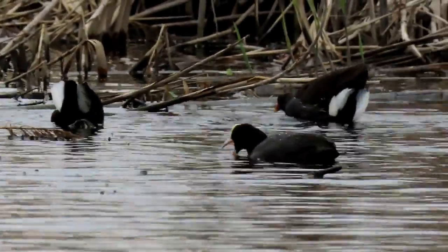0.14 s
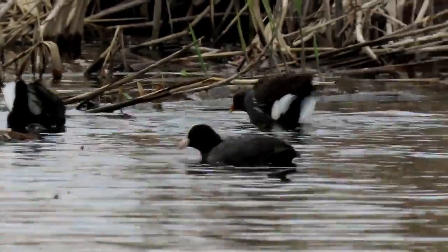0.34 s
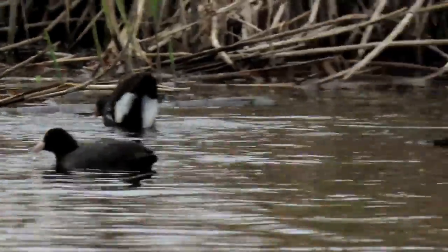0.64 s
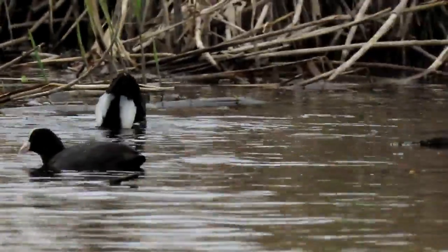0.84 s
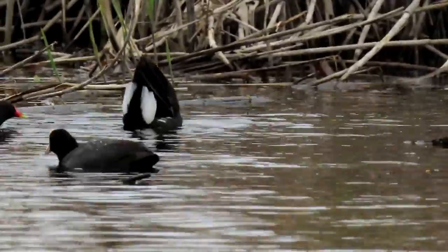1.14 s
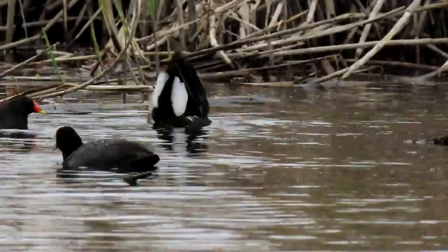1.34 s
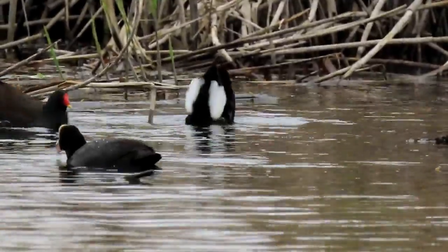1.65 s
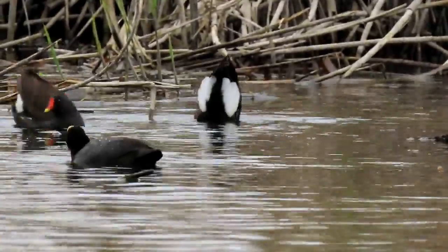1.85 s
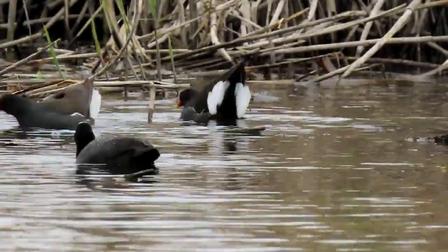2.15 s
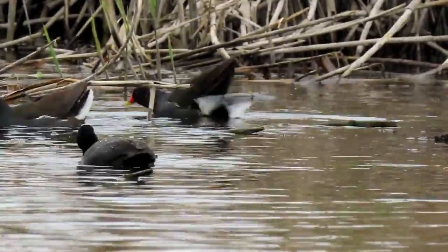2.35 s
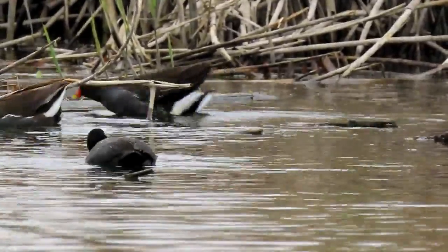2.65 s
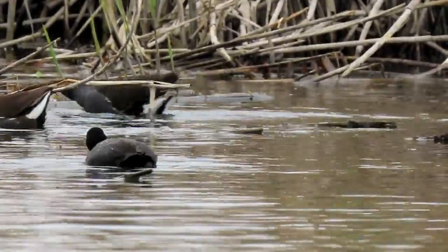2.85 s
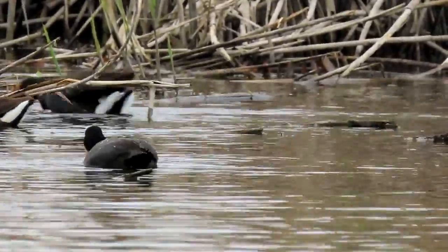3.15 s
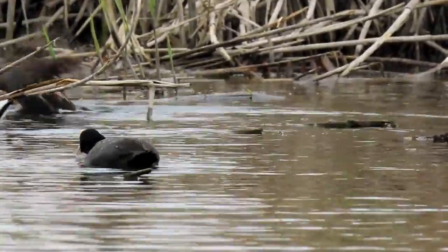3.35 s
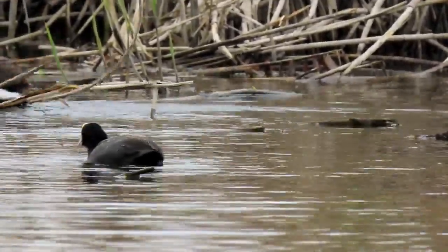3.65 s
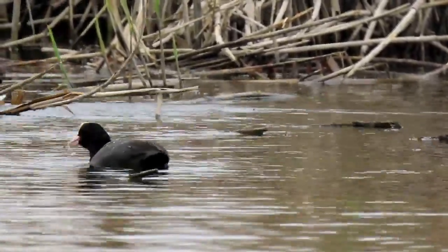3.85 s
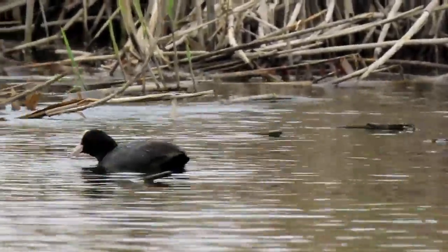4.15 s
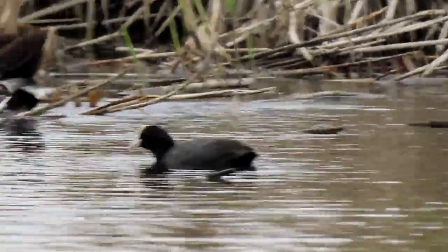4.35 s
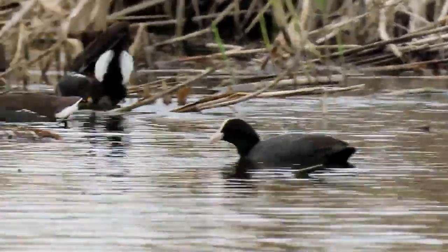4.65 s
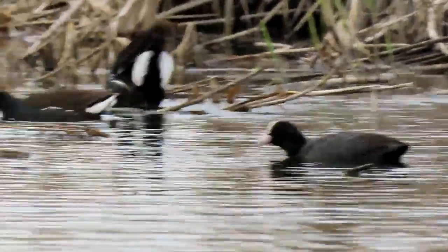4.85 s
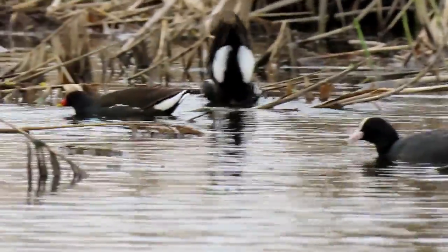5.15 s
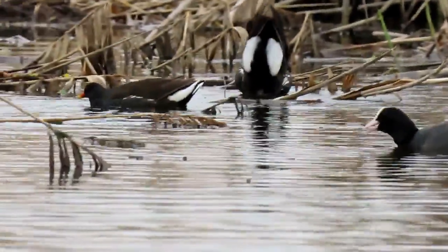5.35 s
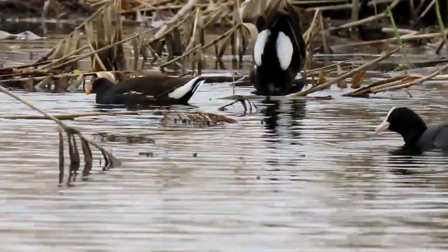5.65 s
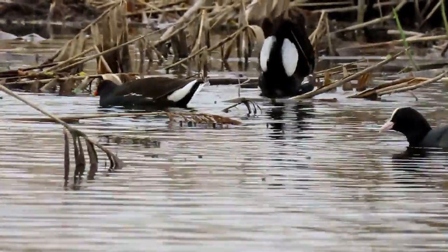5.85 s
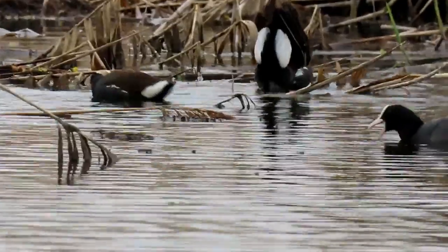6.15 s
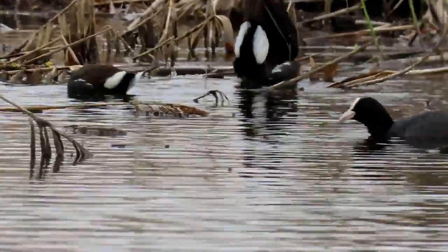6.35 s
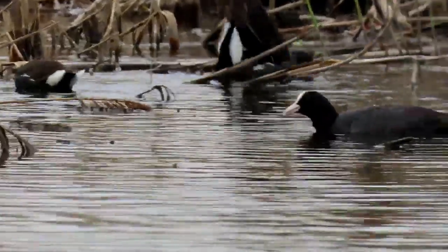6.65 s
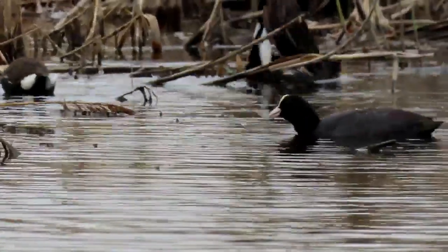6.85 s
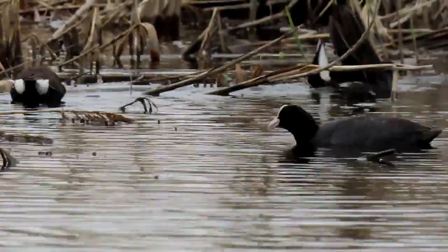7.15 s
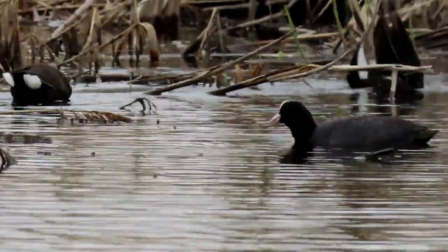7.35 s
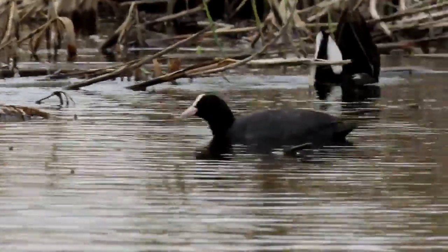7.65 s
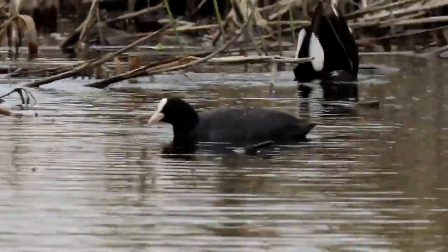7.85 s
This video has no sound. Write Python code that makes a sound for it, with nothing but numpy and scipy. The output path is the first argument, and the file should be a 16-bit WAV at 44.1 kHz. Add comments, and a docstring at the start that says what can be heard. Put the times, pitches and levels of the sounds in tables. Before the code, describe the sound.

On an open reedy lake, a nearby coot gives abrupt, raspy 'kow' calls a little under a second apart, each throbbing hard and then dropping in pitch. Quieter, hoarse notes slip in between. Reeds and bank scatter short echoes. Wind thumps and flutters low on close-set stereo microphones, strongest around three seconds and again near seven, over a faint distant wash.

```python
"""A reedy lake, heard in stereo: near coots, one repeating a sharp, throbbing 'kow', others softer notes.
Strained, clapping partials and breath noise make the calls; reeds, bank and trees scatter them in echoes.
Faint whistled glides are small birds and one high ring after a soft note; short decaying rings are water
ticks and brief knocks at the edges of some soft notes. Gusts buffet the microphones with shaped noise and
pressure pulses; early on a low whirr of blurred tones comes and goes over a faint, distant wash of noise."""
import sys
import numpy as np
from scipy import signal
from scipy.fft import rfft, irfft
from scipy.io import wavfile
from scipy.ndimage import uniform_filter1d, map_coordinates

SR = 44100
rng = np.random.default_rng(int(sys.argv[2]) if len(sys.argv) > 2 else 0)


def persist_wave(psi):
    """Save psi, clipped to +-1, as 16-bit WAV."""
    counts = np.round(np.clip(psi, -1, 1) * 32767).astype(np.int16)
    wavfile.write(sys.argv[1], SR, np.atleast_2d(counts).T)


N = 352800

# sharp calls: start_s, pitch_hz (before scoop and sink), sink_s, level_db, brightness_db_per_octave
KOWS = [(.3785, 1167, 0.036, -20.5, 1.5), (1.3165, 1116, 0.035, -21, -1.5),
        (1.9387, 1127, 0.039, -20.5, -2), (2.7510, 1127, 0.037, -19.5, -1.5),
        (3.5250, 1145, 0.044, -21, -1.5), (4.2780, 1117, 0.039, -22.5, 1.5),
        (4.9242, 1081, 0.031, -25, 1.8), (5.7285, 1123, 0.038, -22.5, 2), (6.3652, 1115, 0.033, -26.5, 1),
        (7.9725, 1042, 0.074, -26, 1.5)]
# resonance of throat and bill: frequency_hz, gain_db
THROAT = [(700, 16), (950, -1.5), (1150, -4.5), (1850, 2), (2150, -5), (2700, -14), (3250, -6.5),
          (3700, -23.5), (4150, -13), (4650, -25.5), (7000, -35), (9500, -42.5), (14000, -61)]
# rasp of air in the bill: frequency_hz, relative_level_db
RASP = [(600, -50), (1150, 12.5), (1550, -7.5), (2150, 20), (2650, -10.5), (3300, 6.5), (4050, 3),
        (4650, -12), (7200, -14.5), (10000, -34), (15000, -62)]
# soft notes: start_s, length_s, start_hz, middle_hz, end_hz, level_db, fade_db (over the note),
# second_partial_db, third_partial_db, upper_partials_db
NOTES = [(.935, 0.038, 1046, 932, 946, -32, 13.5, -0.5, -14.5, -21),
         (3.705, 0.013, 896, 900, 890, -40, 2, -2, -19, -16),
         (3.886, 0.022, 940, 920, 835, -43, 11, 7, -19, -19),
         (3.912, 0.054, 893, 818, 714, -53.5, 7, 5.5, -19, -24),
         (5.391, 0.02, 936, 932, 950, -35, 0, 1, -18, -21),
         (6.907, 0.051, 1010, 911, 887, -29.5, 17.5, 4.5, -3.5, -11),
         (6.956, 0.058, 942, 1059, 950, -41.5, -1.5, -23, 2, -10),
         (7.043, .052, 806, 910, 787, -40, 1.5, -7, -10, -8),
         (7.198, 0.041, 772, 818, 642, -45, 2, -5, -17, -6),
         (7.328, 0.05, 1014, 908, 938, -33.5, 7, 2, -7, -17.5)]
# bill colour on the upper partials of the soft notes: frequency_hz, gain_db
NOTE_TREBLE = [(2700, -1), (3300, -2), (4050, 4), (4700, -8.5), (5500, -13), (6300, -13.5), (7500, -25)]
# faint whistled glides, small birds and one high ring after a soft note:
# start_s, length_s, start_hz, end_hz, level_db
GLIDES = [(.67, 0.055, 5150, 4980, -64), (.702, 0.011, 3040, 2400, -46.5), (.98, 0.1, 4080, 3730, -62),
          (1.055, .03, 4750, 4550, -67), (1.285, 0.029, 4540, 4480, -57), (1.62, 0.054, 5750, 5200, -66),
          (2.875, 0.038, 6470, 4940, -56), (6.54, 0.17, 1988, 1970, -54)]
# short rings, water ticks and brief knocks at the edges of some soft notes:
# start_s, pitch_hz, level_db, decay_s
SHORT_RINGS = [(6.4440, 1070, -23.5, 0.0033), (6.4455, 1800, -26, 0.0025), (6.4490, 920, -28, 0.0028),
               (6.894, 1770, -34, 0.0035), (7.088, 4060, -32, 0.0019), (7.309, 954, -40, 0.0073)]
# echoes from the reed stems, mostly treble: frequency_hz, relative_level_db
REED_ECHO = [(600, -10), (1100, -14), (2100, -1), (3500, 5), (7000, 10.5), (14000, -1.5)]
# echoes from the far trees: frequency_hz, relative_level_db
TREE_ECHO = [(600, -1), (2100, -2.5), (4000, 5), (8000, -7.5), (14000, -19)]
# gusts on the microphones: peak_s, rise_s, fall_s, flutter_db, rumble_db (both trimmed in wind)
GUSTS = [(.04, 0.037, 0.031, -46, -39), (.18, 0.078, 0.044, -44.5, -45), (.44, 0.097, 0.055, -53, -45.5),
         (.73, 0.11, 0.2, -47.5, -43), (2.42, 0.045, 0.066, -37, -28), (2.51, 0.063, 0.05, -39, -36.5),
         (2.73, 0.018, 0.044, -48, -30), (2.805, 0.036, 0.041, -31, -27), (3.06, 0.085, 0.11, -28, -29),
         (3.25, 0.028, 0.022, -37, -32.5), (3.335, 0.017, 0.029, -26, -41),
         (3.41, 0.023, 0.016, -33.5, -30), (3.483, 0.041, .14, -24.5, -34.5),
         (4.11, 0.092, 0.067, -40, -47), (4.63, 0.017, 0.032, -60, -42), (4.91, 0.022, 0.029, -55, -42.5),
         (5.1, 0.11, 0.35, -38, -39), (5.46, 0.17, 0.13, -30, -38), (6.01, 0.12, 0.1, -35.5, -38.5),
         (6.25, 0.11, 0.29, -45, -45), (6.401, 0.02, 0.055, -32, -52), (6.62, 0.049, 0.062, -39, -38),
         (6.759, 0.077, 0.033, -26.5, -30), (6.85, 0.042, 0.025, -28, -29),
         (6.955, 0.074, 0.025, -27, -31.5), (7.055, 0.081, 0.11, -30.5, -35.5),
         (7.58, 0.057, 0.044, -45, -44), (7.95, 0.039, 0.012, -45.5, -48.5)]
# deep wind rumble: frequency_hz, relative_level_db
RUMBLE = [(20, -18), (40, -12), (60, 2), (100, 5.5), (130, 0.5), (200, -33), (400, -81)]
# flutter in light air: frequency_hz, relative_level_db
LIGHT_FLUTTER = [(80, -16), (130, 0), (180, 0), (230, -7), (320, -12.5), (450, -43), (650, -64)]
# flutter in a hard gust: frequency_hz, relative_level_db
HARD_FLUTTER = [(80, -38), (130, 2.5), (190, 4.5), (300, -2), (400, -3), (490, -13), (560, -27), (700, -29),
                (1200, -85)]
# flutter that differs between the two microphones: frequency_hz, relative_level_db
FLUTTER_SIDE = [(60, -14), (130, -8), (250, 13), (400, 11), (520, 0), (700, -9), (1200, -46)]
# single eddies that thump the microphones: centre_s, frequency_hz, pressure_db
EDDIES = [(0.857, 141, -27), (2.512, 90, -20), (2.797, 159, -15), (3.128, 154, -14), (3.484, 210, -9),
          (3.674, 310, -25.5), (5.47, 218, -15), (5.554, 232, -22.5), (6.045, 158, -18), (6.386, 228, -19),
          (6.458, 180, -19.5), (7.057, 210, -15.5)]
# swells of the low whirr: start_s, end_s, level_db, growth_db_per_s
WHIRRS = [(0.586, 1.285, -59.5, 8), (1.268, 1.478, -51.5, 25), (1.694, 2.357, -46, -1.5)]
# tones of the whirr: pitch_ratio, relative_level_db
WHIRR_LINES = [(1, -0.5), (1.15, -1), (1.36, -7), (1.6, -12.5), (1.9, -9.5)]
# band of noise around those tones: frequency_hz, relative_level_db
WHIRR_BLUR = [(200, 2), (310, 16), (430, 9), (560, 12.5), (700, 14.5), (850, -30), (1300, -42)]
# distant wash, with the hum of a far road near 900 Hz: frequency_hz, relative_level_db
WASH = [(20, 4), (90, -2), (200, -6.5), (480, -5.5), (680, -8), (880, 4), (1020, -3), (1250, -10.5),
        (2000, -11.5), (3300, -16.5), (5000, -20.5), (8000, -27), (10500, -32.5), (15000, -39.5)]
# hiss that differs between the two microphones: frequency_hz, level_db (relative to the wash)
HISS = [(200, -42), (380, -23), (900, -22), (2000, -9), (4000, -4), (8000, -1), (12000, 1.5)]

# course of every sharp call; ages are shares of its sinking time
KOW_SINK, KOW_SINK_AGE, KOW_SINK_SPREAD = .165, .83, 0.1026  # share the pitch falls, when, how gradually
KOW_SCOOP = 0.0508  # share by which the pitch starts low while the call swells
KOW_START_DB, KOW_SWELL_AGE = -7, 0.6  # starts softer, at full strength by that age
KOW_RELAX_DB, KOW_RELAX_AGE = -8, 1  # softer once the strain lets go
KOW_RELEASE_AGE, KOW_END_AGE = 1.4, 1.97  # fades out between these ages
THROB_HZ = 136
GUST_ROUNDNESS = 2.01  # 1 = a pointed swell, 2 = a bell
LULL_RUMBLE_DB, LULL_FLUTTER_DB = -56, -63.5  # light air between the gusts, trimmed like them
WHIRR_EDGE_S = .04  # half the length of each fade
WHIRR_TOP_HZ, WHIRR_END_HZ = 458, 316.3
WHIRR_SINKS_S, WHIRR_SINK_TIME_S = 1.18, 0.23  # centre and gradualness of its one fall in pitch
WASH_DB = -51
TOP_HZ = 14900
SIDES = np.array([[1], [-1]])  # opposite sign in the two microphones


def kow(hz, sink_s, db, bright_db, bend=0.072, jitter=0.038, calm_jitter=0.0088, rasp_db=-11,
        fundamental_throb=0.49, slack_db=-4):
    """The membrane starts in a few hard throbs, then settles into a clean, sinking tone."""
    t = ages(KOW_END_AGE * sink_s)
    progress = t / sink_s
    early = np.clip(1 - progress / KOW_SWELL_AGE, 0, 1)
    relaxed = step((progress - KOW_RELAX_AGE) / KOW_SINK_SPREAD)
    release = (KOW_END_AGE - progress) / (KOW_END_AGE - KOW_RELEASE_AGE)
    fade = np.clip(np.minimum(t / 0.00035, release), 0, 1)
    level = undb(KOW_START_DB * early + KOW_RELAX_DB * relaxed) * fade
    strain = np.clip((1.15 - progress) / .5, 0, 1)

    # the membrane claps shut in every throb, each time more briefly
    beat = np.cos(np.pi * THROB_HZ * (t - .0084)) ** 2
    closed = .95 * strain * np.clip(.6 + t / .015, 0, 1) * beat ** (.6 + (t / .0135) ** 2)

    # the pitch arches in every throb, and shakes most while the membrane is strained
    sunk = step((progress - KOW_SINK_AGE) / KOW_SINK_SPREAD)
    pitch = hz * (1 - KOW_SCOOP * early - KOW_SINK * sunk) * (1 + bend * strain * (.5 - beat))
    shake = 1 + (calm_jitter + jitter * strain) * walk(2205, len(t))
    phase = 2 * np.pi * np.cumsum(pitch * shake) / SR
    voice = gain_at(pitch, THROAT) * np.sin(phase) * (1 - fundamental_throb * closed)

    # the overtones dim as the membrane slackens
    tilt_db = bright_db + slack_db * np.clip(progress - .8, 0, 1)
    for k in np.arange(2, 14):
        gain = gain_at(k * pitch, THROAT) * undb(tilt_db * np.log2(k))
        voice += gain * np.sin(k * phase + rng.uniform(0, np.pi)) * (1 - closed)

    # air rasps through the bill, slightly stronger once a cycle
    rasp = noise(RASP, len(t)) * (1 + 0.043 * np.cos(phase)) * (1 - closed) * (0.87 + 1.3 * strain)
    return undb(db) * level * (voice + undb(rasp_db + bright_db) * rasp)


def note(length, start_hz, middle_hz, end_hz, db, fade_db, second_db, third_db, upper_db, jitter=0.025,
         rasp_db=-6, catch_db=-12, catch_s=0.0019, attack_s=0.0045, release_s=.005):
    """A soft note on a curved pitch, slightly hoarse, with a rough catch as it starts."""
    t = ages(length)
    u = t / length
    curve = np.polyfit([0, .5, 1], [start_hz, middle_hz, end_hz], 2)
    pitch = np.polyval(curve, u)
    phase = 2 * np.pi * np.cumsum(pitch * (1 + jitter * walk(1690, len(t)))) / SR
    voice = np.sin(phase) + undb(second_db) * np.sin(2 * phase) + undb(third_db) * np.sin(3 * phase)
    for k in np.arange(4, 9):
        voice += undb(upper_db) * gain_at(k * pitch, NOTE_TREBLE) * np.sin(k * phase)
    breath = undb(upper_db + rasp_db) + undb(catch_db) * np.exp(-t / catch_s)
    voice += breath * noise(RASP, len(t))
    fade = np.clip(np.minimum(t / attack_s, (length - t) / release_s), 0, 1)
    return voice * undb(db - fade_db * u) * fade


def glide(length, start_hz, end_hz, db, waver=0.0075):
    """A thin, faint whistled glide: one wavering sine that swells and fades."""
    u = ages(length) / length
    pitch = (start_hz + (end_hz - start_hz) * u) * (1 + waver * walk(408, len(u)))
    return undb(db) * np.sin(np.pi * u) * np.sin(2 * np.pi * np.cumsum(pitch) / SR)


def short_ring(hz, db, decay):
    """A short ring, a water tick or a brief knock: one sine that decays within a few cycles or so."""
    t = ages(0.04)
    return undb(db) * np.exp(-t / decay) * np.sin(2 * np.pi * hz * t) * np.clip(t / 0.00023, 0, 1)


def on_lake(rows, source, wet_db):
    """Place a sound on the lake for every row, each with its own echoes."""
    track = np.zeros((2, N))
    for s, *values in rows:
        add(track, s, shore(source(*values), wet_db))
    return track


def shore(x, wet_db, reeds_db=-11, reeds_t60=0.23, far_db=-24, far_t60=0.6, bank_s=.05, bank_db=-22,
          width=0.17, spread_db=4):
    """Reeds scatter a sound, the bank echoes it and trees add a faint tail, drawn afresh each time."""
    mid = scatter(REED_ECHO, reeds_t60, reeds_db) + scatter(TREE_ECHO, far_t60, far_db)
    mid[int(bank_s * rng.uniform(.9, 1.1) * SR)] += undb(bank_db)
    # the close-set microphones differ mostly in the treble
    side_echo = [(hz, db + spread_db * np.log2(hz / 2000)) for hz, db in REED_ECHO]
    side = width * scatter(side_echo, reeds_t60, reeds_db + 12.5)
    response = undb(wet_db) * np.array([mid + side, mid - side])
    response[:, 0] += 1  # direct sound
    return signal.fftconvolve(x[None], response, axes=1)


def scatter(points, t60, db, build_s=0.0054):
    """A dense cloud of echoes that builds up and fades by 60 dB in t60 seconds."""
    t = ages(.7)
    h = noise(points, len(t)) * undb(-60 * t / t60) * np.clip(t / build_s, 0, 1) ** 2
    return h * undb(db) / np.sqrt(np.sum(h ** 2))


def wind(patchy_db=4.5, rumble_trim_db=-1, flutter_trim_db=-1, light_db=-42, hard_db=-27, side_db=-21,
         rumble_side_db=-35):
    """Turbulence on the microphones: rumble, flutter that brightens in hard gusts, and single eddies."""
    flutter_db, rumble_db = gusts()
    hard = np.clip((flutter_db - light_db) / (hard_db - light_db), .1, 1)
    flutter = np.sqrt(1 - hard) * turbulence(LIGHT_FLUTTER) + np.sqrt(hard) * turbulence(HARD_FLUTTER)
    flutter = flutter * undb(patchy_db * walk(70))
    flutter = flutter + SIDES * undb(side_db) * hard * noise(FLUTTER_SIDE)
    rumble = turbulence(RUMBLE) + SIDES * undb(rumble_side_db) * noise(RUMBLE)
    air = undb(rumble_db + rumble_trim_db) * rumble + undb(flutter_db + flutter_trim_db) * flutter
    for s, hz, db in EDDIES:
        thump = eddy(hz, db)
        add(air, s - len(thump) / 2 / SR, thump)
    return air


def gusts():
    """Flutter and rumble in dB: every gust swells and dies away over restless light air."""
    t = np.arange(N) / SR
    power = undb([[LULL_FLUTTER_DB], [LULL_RUMBLE_DB]]) ** 2 * undb(1.9 * walk(12)) ** 2
    for s, rise, fall, flutter_db, rumble_db in GUSTS:
        away = np.minimum(np.maximum((s - t) / rise, (t - s) / fall), 10)
        swell = np.exp(-away ** GUST_ROUNDNESS)
        power = power + (undb([[flutter_db], [rumble_db]]) * swell) ** 2
    return 10 * np.log10(power)


def turbulence(points, size=2600):
    """Noise evened out in strength over a short window, ready to be driven by a gust."""
    x = noise(points)
    return x / np.sqrt(uniform_filter1d(x ** 2, size) + 0.061)


def eddy(hz, db):
    """A vortex passes: the pressure rises, drops at its core and rises again."""
    u = np.pi * hz * (ages(.04) - .02)
    return undb(db) * (2 * u ** 2 - 1) * np.exp(-u ** 2)


def whirr(blur_hz=16, diffuse_db=-5, side_db=-15):
    """A few blurred tones that sink together in a band of noise."""
    t = np.arange(N) / SR
    sunk = step((t - WHIRR_SINKS_S) / WHIRR_SINK_TIME_S)
    hz = WHIRR_TOP_HZ + (WHIRR_END_HZ - WHIRR_TOP_HZ) * sunk
    level = np.zeros(N)
    for start, end, db, growth in WHIRRS:
        fade = np.clip(.5 + np.minimum(t - start, end - t) / (2 * WHIRR_EDGE_S), 0, 1)
        level += undb(db + growth * np.clip(t - start, 0, end - start)) * fade
    phase = 2 * np.pi * np.cumsum(hz) / SR
    tones = np.zeros(N)
    for ratio, db in WHIRR_LINES:
        blurred = walk(blur_hz) * np.sin(ratio * phase) + walk(blur_hz) * np.cos(ratio * phase)
        tones += undb(db) * blurred
    x = tones / tones.std() + undb(diffuse_db) * noise(WHIRR_BLUR)
    return level * (x / x.std() + undb(side_db) * noise(WHIRR_BLUR) * SIDES)


def background(swell_db=0.08):
    """A far wash that swells slightly; hiss sets the two microphones apart, most in the treble."""
    wash = noise(WASH)
    hiss = irfft(rfft(noise(WASH)) * gain_at(np.fft.rfftfreq(N, 1 / SR), HISS), N)
    return undb(WASH_DB) * (undb(swell_db * walk(3.056)) * wash + hiss * SIDES)


def undb(db):
    """Decibels to gain."""
    return 10 ** (np.asarray(db) / 20)


def gain_at(hz, points):
    """Gain of a (Hz, dB) spectrum at the given frequencies."""
    f, db = np.transpose(points)
    return undb(np.interp(np.log(np.maximum(hz, 1)), np.log(f), db))


def noise(points, size=N):
    """Noise of unit rms with the given spectrum."""
    gain = gain_at(np.fft.rfftfreq(size, 1 / SR), points)
    x = irfft(rfft(rng.standard_normal(size)) * gain, size)
    return x / x.std()


def walk(rate, size=N):
    """Smooth random wandering, of about unit spread, that changes about rate times a second."""
    place = np.arange(size) * rate / SR
    return map_coordinates(rng.standard_normal(size // 8 + 8), [place + 2], order=2, mode="wrap")


def step(x):
    """A smooth step from 0 to 1 around x = 0."""
    return .5 + .5 * np.tanh(x / 2)


def ages(length):
    """Sample times of a short sound, in seconds."""
    return np.arange(int(length * SR)) / SR


def add(track, s, x):
    """Mix a short sound into a track at time s."""
    i = int(s * SR)
    track[:, i:i + x.shape[-1]] += x[..., :max(N - i, 0)]


def scene():
    """Coots, glides and short rings with the shore's echoes; wind, whirr and background on top."""
    coots = on_lake(KOWS, kow, wet_db=4.0) + on_lake(NOTES, note, wet_db=6.0)
    small = on_lake(GLIDES, glide, wet_db=6.0) + on_lake(SHORT_RINGS, short_ring, wet_db=4)
    return coots + small + wind() + whirr() + background()


def record(dry):
    """The top treble is cut; the sound eases in and out over a few milliseconds."""
    t = np.arange(N) / SR
    edges = np.clip(np.minimum(t, t[-1] - t) / .003, 0, 1)
    low_pass = signal.ellip(6, .1, 50, TOP_HZ, fs=SR, output="sos")
    return signal.sosfiltfilt(low_pass, dry * edges)


dry = scene()
out = record(dry)
persist_wave(out)
```